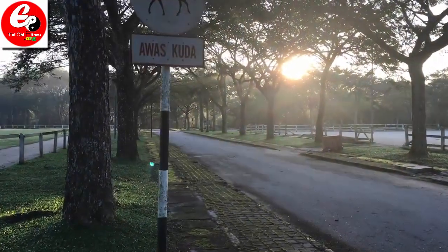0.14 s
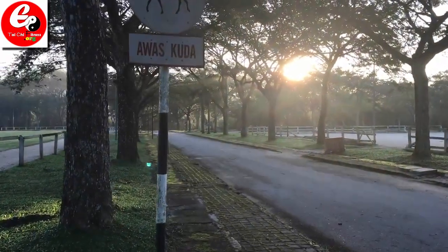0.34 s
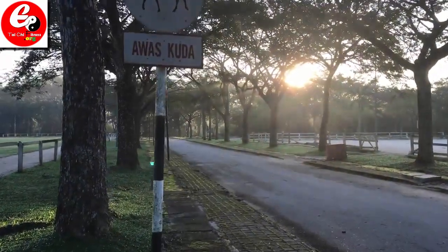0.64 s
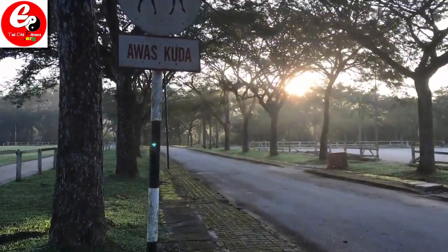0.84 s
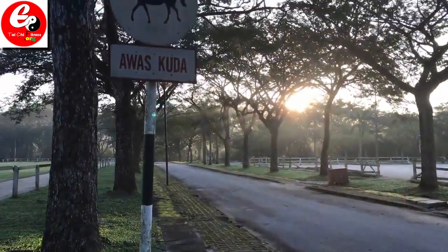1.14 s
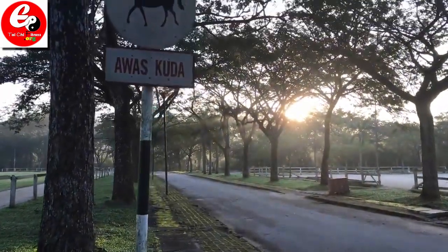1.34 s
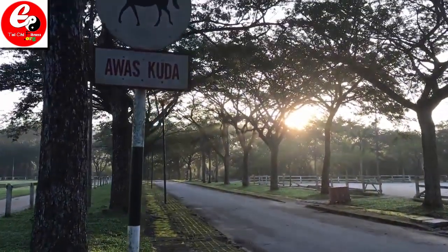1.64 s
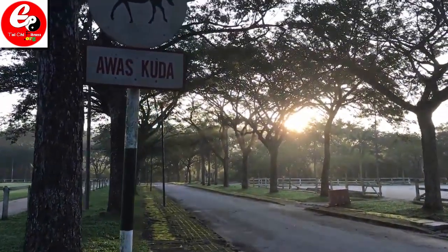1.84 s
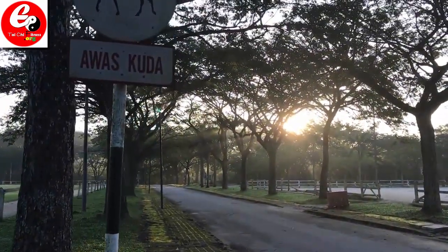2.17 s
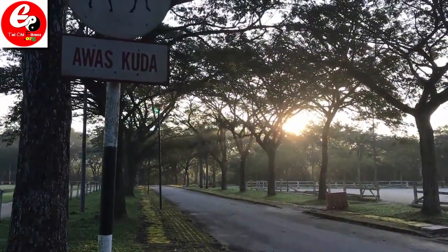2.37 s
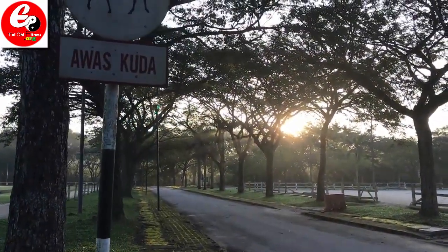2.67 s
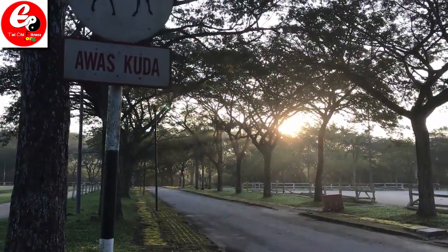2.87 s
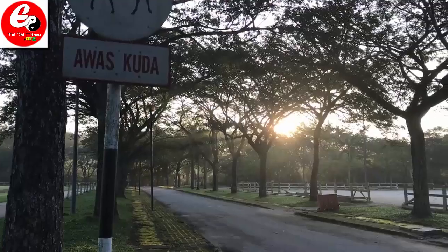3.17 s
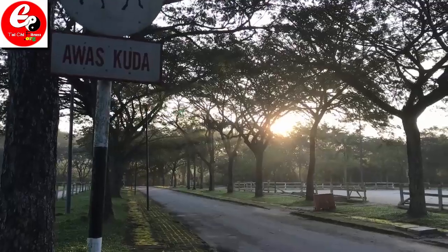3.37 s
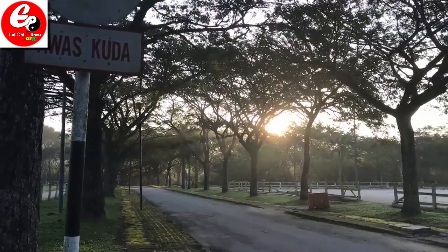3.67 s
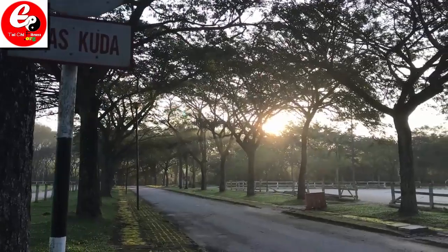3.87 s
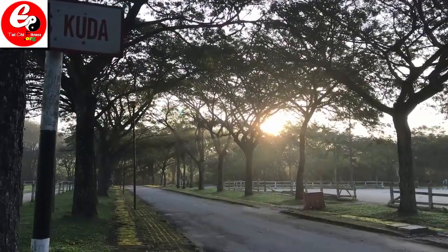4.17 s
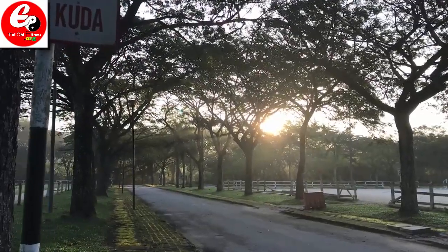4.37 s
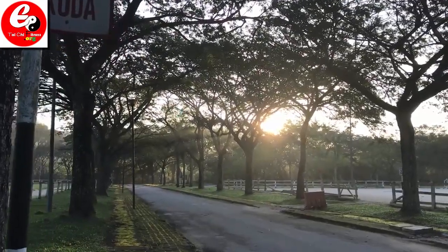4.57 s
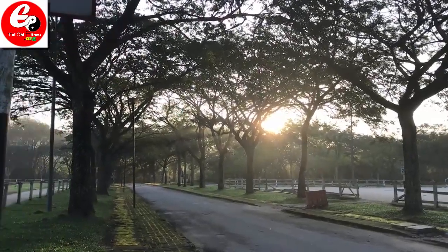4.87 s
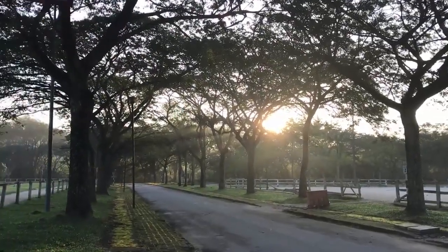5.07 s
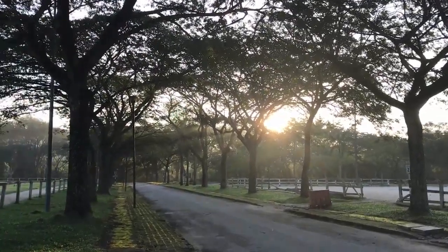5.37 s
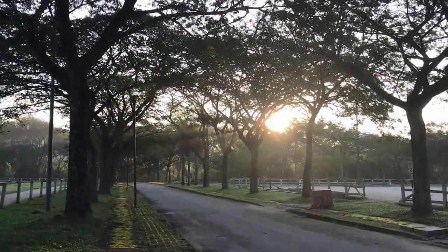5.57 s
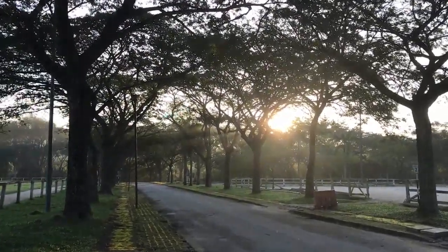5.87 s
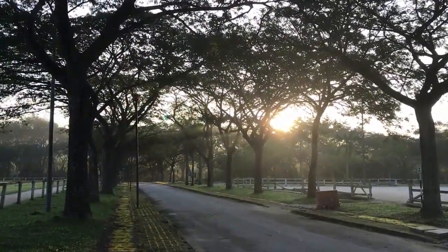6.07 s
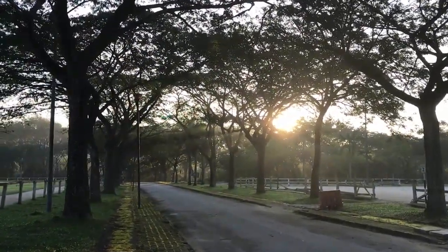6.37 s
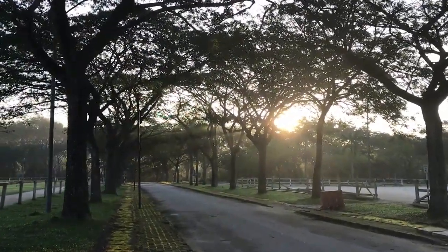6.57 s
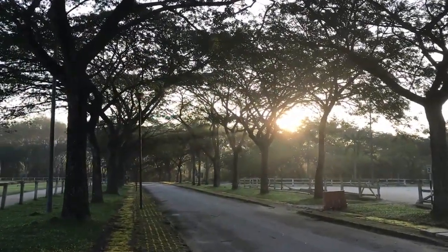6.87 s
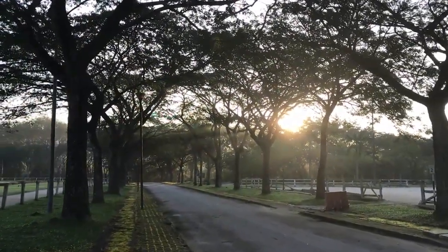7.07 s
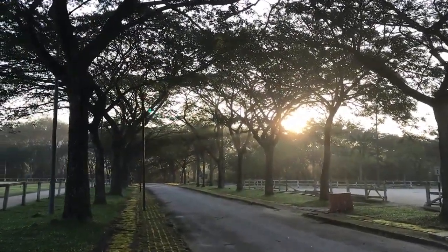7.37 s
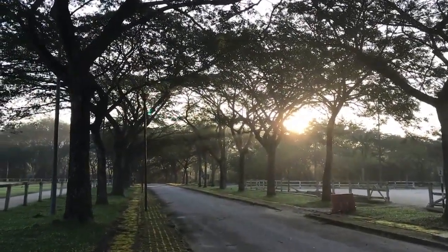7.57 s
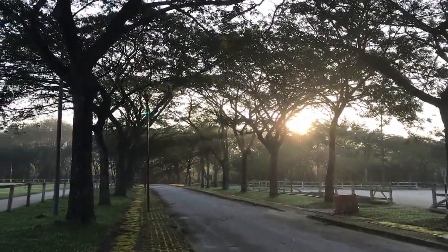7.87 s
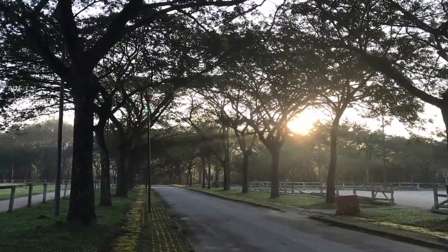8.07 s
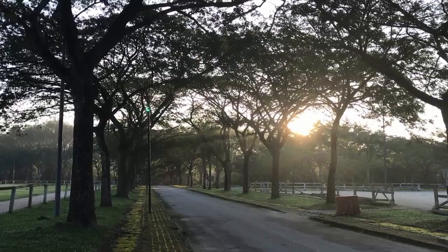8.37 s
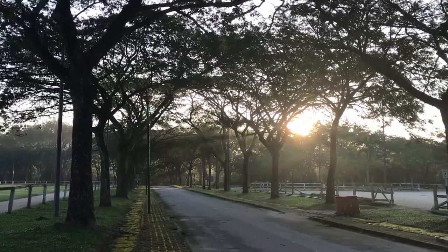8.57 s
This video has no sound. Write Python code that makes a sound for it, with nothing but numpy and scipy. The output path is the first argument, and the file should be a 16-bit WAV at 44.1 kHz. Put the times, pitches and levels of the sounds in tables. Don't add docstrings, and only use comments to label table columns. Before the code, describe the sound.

Dawn birdsong of clear, quick whistles echoes softly through trees, with shrill insect buzz, tiny drips and twig ticks above a distant road rumble.

```python
import sys
import numpy as np
from scipy import signal
from scipy.io import wavfile
from scipy.ndimage import uniform_filter1d

SR = 44100
rng = np.random.default_rng(int(sys.argv[2]) if len(sys.argv) > 2 else 0)


def nominal_scale(level):
    x = np.asarray(level, float) / 20
    return 10 ** x


def persist_wave(psi):
    counts = np.round(np.clip(psi, -1, 1) * 32767).astype(np.int16)
    wavfile.write(sys.argv[1], SR, np.atleast_2d(counts).T)


N = 384993
TIME = np.arange(N) / SR


def evened(x):
    return x / np.sqrt(np.mean(x ** 2) + 1e-20)


def read(points, hz):
    f, value = np.transpose(points)
    return np.interp(np.log(hz + 1), np.log(f + 1), value)


def follow(rows):
    s, *columns = np.transpose(rows)
    return [np.interp(TIME, s, c) for c in columns]


def add(mix, s, sound):
    part = mix[round(s * SR):][:len(sound)]
    part += sound[:len(part)]


def resonate(x, hz, width_hz):
    turn = np.exp(2j * np.pi * np.cumsum(hz * np.ones(len(x))) / SR)
    r = np.exp(-np.pi * width_hz / SR)
    smooth = signal.lfilter([(1 - r) ** 2], np.convolve([1, -r], [1, -r]), x / turn)
    return 2 * (turn * smooth).real


def band(x, lo_hz, hi_hz):
    return signal.sosfilt(signal.butter(3, [lo_hz, hi_hz], "bandpass", fs=SR, output="sos"), x)


def whistle(hz, level_db, edge=0.3):
    noise = rng.standard_normal((2, len(hz) + 1000))
    air = evened(uniform_filter1d(uniform_filter1d(noise, 200), 200))[:, :len(hz)]
    shimmer_db = 1.4 + .14 * max(-56 - level_db, 0)
    shape = signal.windows.tukey(len(hz), np.clip(edge, 0, 1)) * nominal_scale(shimmer_db * air[0])
    phase = 2 * np.pi * np.cumsum(hz + 12 * air[1]) / SR
    return nominal_scale(level_db) * np.sqrt(2) * shape * np.sin(phase)


def arches(rows, lean=1):
    out = np.zeros(N)
    for s, length_s, start, middle, end, db in rows:
        u = np.linspace(0, 1, round(length_s * SR)) ** lean
        bulge_hz = middle - (start + end) / 2
        add(out, s, whistle(start + (end - start) * u + 4 * bulge_hz * u * (1 - u), db))
    return out


def glides(rows, share):
    s, length_s, start, end, db = np.transpose(rows)
    return arches(np.c_[s, length_s, start, start + share * (end - start), end, db])


def songs():
    # (time [s], length [s], pitch [Hz], level [dB])
    held_notes = [(0, 0.064, 3930, -57), (.04, 0.061, 2820, -64), (1.67, 0.03, 3500, -66),
                  (2.06, 0.064, 4200, -65), (2.37, .035, 3480, -68), (2.5, 0.027, 2160, -66),
                  (3.66, 0.067, 3880, -77), (2.26, .04, 3550, -67), (5.15, .055, 2120, -68),
                  (5.15, .15, 2350, -72), (5.72, .05, 4180, -74), (6.62, .11, 5150, -76),
                  (4.265, .03, 5350, -72), (4.19, .06, 4130, -68), (.33, .07, 2680, -66),
                  (6.6, .035, 3750, -64), (1.79, .025, 3500, -63), (3.965, 0.075, 2400, -66),
                  (4.35, 0.065, 2690, -69), (4.405, 0.1, 3600, -56.5), (4.47, .066, 2390, -72),
                  (4.79, .03, 1690, -63), (5.5, 0.045, 2100, -70), (6, 0.13, 2476, -65),
                  (6.383, .015, 2090, -59), (6.399, .015, 2090, -59), (6.416, .015, 2080, -60),
                  (6.47, 0.089, 3800, -69), (6.9, 0.14, 4250, -74), (7.1, 0.017, 3980, -63),
                  (7.2, .09, 3930, -58.5), (7.3, 0.14, 1956, -68), (8.6, 0.083, 2480, -64.5)]
    # (time [s], length [s], middle [Hz], ends [Hz], level [dB])
    arched_notes = [(1.528, .105, 3310, 3040, -57), (1.02, 0.057, 2983, 2680, -67),
                    (1.738, 0.18, 4170, 3560, -54.5), (2.462, .085, 3090, 2680, -68),
                    (4.9, 0.09, 2580, 2300, -64.5), (3.71, .075, 5560, 5250, -73),
                    (1.65, .11, 4360, 4200, -65), (2.73, .05, 3030, 2750, -67),
                    (2.785, .045, 2930, 2700, -68), (2.59, .03, 2880, 2700, -69),
                    (.8, .06, 2950, 2700, -66), (5.625, .095, 2595, 2180, -66),
                    (7.098, 0.14, 3640, 3820, -70), (7.45, .11, 3210, 3045, -59),
                    (7.692, 0.13, 4065, 3560, -55), (8.39, 0.0475, 2780, 2400, -65)]
    # (time [s], length [s], from [Hz], to [Hz], level [dB])
    droops = [(0, 0.08, 3370, 3030, -65), (3.82, 0.19, 2760, 2580, -66), (4.27, 0.034, 4660, 3200, -58),
              (4.53, 0.043, 2700, 2170, -68), (4.56, .16, 3560, 2890, -61), (5.11, 0.04, 2930, 2410, -67),
              (1.5, .03, 3050, 2750, -62), (8.545, .03, 3080, 2750, -63), (5.62, .04, 2750, 2570, -69),
              (5.82, 0.053, 3600, 2840, -64), (6.175, 0.088, 3800, 3664, -55),
              (6.355, 0.08, 3860, 3620, -54.5), (6.425, .028, 3680, 3350, -61),
              (8.33, 0.025, 2770, 2430, -64)]
    falls = [(1.21, 0.034, 3280, 2680, -60.5), (1.37, 0.17, 3260, 3020, -57), (1.9, .03, 4450, 3890, -63),
             (3.22, .02, 5760, 5350, -73), (4.21, 0.048, 2884, 2670, -68), (5.025, 0.03, 3080, 2700, -61),
             (6.1, .27, 3600, 2700, -67), (2.435, .035, 3200, 2750, -67), (2.7, .025, 2600, 2100, -69),
             (5.73, .045, 3150, 2600, -68), (5.81, .045, 2800, 2400, -67), (8.3, .04, 2900, 1950, -68),
             (1.315, .025, 3250, 3000, -64), (6.25, 0.073, 1810, 1683, -62), (6.63, .022, 2100, 1950, -60),
             (6.925, 0.061, 3100, 2410, -63), (8.27, 0.032, 3300, 2940, -57)]
    swoops = [(.175, 0.082, 3180, 2870, -65), (1.55, .07, 2630, 2420, -67), (3.03, 0.085, 3700, 3320, -75),
              (5.585, .18, 3970, 3480, -67), (5.865, .035, 2250, 2090, -61), (5.83, 0.044, 3940, 3670, -65),
              (6.23, .039, 2200, 2030, -63), (7.23, .13, 2480, 2050, -63), (7.54, .04, 2893, 2380, -71),
              (7.82, .15, 2380, 1980, -64), (7.75, .06, 3050, 2950, -66), (8.42, .14, 3270, 3050, -58.5),
              (8.57, .05, 2800, 2480, -67), (5.13, .12, 4250, 4070, -77), (6.16, .025, 4600, 3850, -68)]
    rises = [(5.22, 0.25, 4040, 4420, -74), (4.245, .03, 4250, 4650, -67), (6.02, .022, 4800, 5050, -68),
             (4.935, .055, 5400, 5700, -75), (2.405, .045, 2250, 2650, -70), (1.13, .04, 3300, 3950, -68),
             (1.205, .015, 3600, 4100, -66), (5.6, .04, 2050, 2250, -68), (.418, .026, 2800, 3750, -63),
             (.712, .028, 2750, 3650, -63), (1.18, .02, 3800, 4160, -62), (2.61, 0.055, 5400, 5830, -73),
             (3.185, 0.039, 5230, 5770, -78), (5.92, 0.062, 3243, 3400, -64),
             (7.175, .035, 3720, 3900, -64), (6.652, .016, 2850, 3160, -54),
             (6.678, 0.017, 2910, 3470, -63), (6.8, 0.14, 2730, 2870, -56.5),
             (7.062, .02, 2830, 4180, -58.5), (7.078, .014, 3670, 4070, -62), (8.67, .03, 2650, 2980, -67)]
    s, length_s, hz, db = np.transpose(held_notes)
    ends_hz = hz * (1 - 0.0058)
    out = arches(np.c_[s, length_s, ends_hz, hz, ends_hz, db])
    s, length_s, middle, ends, db = np.transpose(arched_notes)
    out += arches(np.c_[s, length_s, ends, middle, ends, db], lean=0.78)
    out += glides(droops, share=.2) + glides(falls, share=.51)
    return out + glides(swoops, share=.72) + glides(rises, share=.58)


def twitter(count=600):
    # (time [s], level [dB])
    far_birds = [(0, -62.5), (.9, -67), (1.9, -66), (2.2, -66), (2.6, -68), (3.4, -70), (4.3, -65.5),
                 (5.3, -74), (6.5, -64), (7.9, -66.5), (8.73, -72)]
    s, length, hz, bend, arch, size = rng.random((count, 6)).T
    hz = 2500 + 1250 * hz ** 2.4
    bend_hz = np.sign(bend - .9) * (300 + 400 * arch)
    middle_hz = hz + .5 * bend_hz + 150 * size
    rows = np.c_[s * N / SR, .018 + .03 * length, hz, middle_hz, hz + bend_hz, 6.0 * size]
    return evened(arches(rows)) * nominal_scale(follow(far_birds)[0])


def cicada(rows, strokes_per_s):
    # (delay [ms], pitch factor [ratio], width [Hz], level [dB])
    ribs = [
        (0, 1.025, 650, -1),
        (1.2, .995, 500, 0),
        (2.6, .968, 450, -5),
    ]
    level_db, hz = follow(rows)
    strokes = np.flatnonzero(np.diff(np.floor(strokes_per_s * TIME)))
    out = np.zeros(N)
    for delay_ms, pitch, width_hz, db in ribs:
        clicks = np.zeros(N + 1000)
        chance = rng.standard_normal((len(strokes), 2))
        delay = np.round((delay_ms + .25 * chance[:, 0]) * SR / 1000).astype(int)
        clicks[np.maximum(strokes + delay, 0)] = nominal_scale(0.45 * chance[:, 1])
        out += nominal_scale(db) * evened(resonate(clicks[:N], hz * pitch, width_hz))
    return nominal_scale(level_db) * evened(out)


def cicadas():
    # (time [s], level [dB], pitch [Hz])
    cicada_a = [(0, -61, 10150), (.9, -62, 9950), (2.1, -62, 9680), (3.2, -61.5, 9750), (3.75, -61.5, 9580),
                (4.2, -64.5, 9500), (4.75, -60.5, 9530), (5.2, -72, 9600), (6.5, -79, 9600),
                (8.73, -75, 9560)]
    cicada_b = [(0, -66.5, 9260), (2, -69.5, 9230), (4, -69.5, 9500), (4.4, -81.5, 10000), (5.1, -66, 9483),
                (5.8, -67, 9660), (6.3, -71, 9500), (6.6, -73, 9760), (8.73, -76, 9550)]
    cicada_c = [(0, -72, 8950), (1, -68.5, 8930), (3, -66, 8900), (4, -65, 8900), (5.73, -66, 8870),
                (5.76, -84, 8870), (8.73, -84, 8870)]
    # (time [s], throbs so far [count])
    throbs = [(0, 0), (1.25, 7), (1.72, 10), (3.26, 19), (4.79, 28), (5.74, 34), (8.73, 35)]
    stroke_rates = (122.8, 118.4, 112)
    beats = follow(throbs)[0] % 1
    first, second, third = map(cicada, (cicada_a, cicada_b, cicada_c), stroke_rates)
    throb_db = -24 * (1 - beats) ** 3
    return band(first + second + third * nominal_scale(throb_db), 8400, 10600)


def far_insects():
    # (pitch [Hz], width [Hz], level [dB])
    chorus = [
        (9600, 900, -70.5),
        (9050, 800, -75),
    ]
    # (time [s], level [dB], pitch [Hz])
    shrill_points = [(0, -86, 12900), (1.05, -87, 12750), (1.2, -86, 11500), (1.6, -81, 11700),
                     (3.8, -83, 11300), (5.8, -85, 11100), (8.73, -95, 10800)]
    # (time [s], level [dB])
    cricket_points = [(0, -80), (1, -77), (1.26, -87), (2, -76), (2.64, -85), (3.27, -79), (3.9, -82.5),
                      (4.9, -77), (5.31, -88), (6.25, -78), (6.44, -86), (7.8, -81), (8.73, -84)]
    noise = rng.standard_normal((3, N))
    far = sum(nominal_scale(db) * evened(resonate(noise[0], hz, width_hz)) for hz, width_hz, db in chorus)
    shrill_db, shrill_hz = follow(shrill_points)
    shrill = nominal_scale(shrill_db) * evened(resonate(noise[1], shrill_hz, 750))
    crickets_db = follow(cricket_points)[0]
    crickets_hz = 6830 + 25 * (crickets_db + 85.5)
    return far + shrill + nominal_scale(crickets_db) * evened(resonate(noise[2], crickets_hz, 420))


def rustle():
    # (time [s], length [s], level [dB])
    gusts = [
        (1.33, 0.35, -79),
        (4.1, .45, -73),
        (4.937, 0.264, -75),
        (5.776, 0.53, -84),
        (6.55, 0.27, -79),
    ]
    still_db, rise_s, fade_db = -84.5, 0.023, -14.5
    grains = rng.standard_normal(N) * (0.72 + (rng.random(N) < 900 / SR) * 3.0)
    level = np.full(N, nominal_scale(still_db))
    for s, length_s, db in gusts:
        t = np.arange(0, length_s, 1 / SR)
        ramps = np.clip(np.minimum(t, length_s - t) / rise_s, 0, 1)
        add(level, s, nominal_scale(db + fade_db * t / length_s) * ramps)
    body = evened(resonate(grains, 5400, 3500))
    top = evened(resonate(grains, 13000, 3000))
    return nominal_scale(4.5) * level * (body + nominal_scale(-13) * top)


def wash(spectrum, patchy_db):
    hz = np.fft.rfftfreq(2048, 1 / SR)
    a, b, patches = rng.standard_normal((N // 512 + 5, 1025, 3)).T
    patches = evened(uniform_filter1d(uniform_filter1d(patches, 20, 0), 8, 1))
    z = (a + 1j * b) * nominal_scale(read(spectrum, hz)[:, None] + patchy_db * patches)
    return evened(signal.istft(z, nperseg=2048, noverlap=1536)[1][:N])


def traffic_and_air():
    # (frequency [Hz], density [dB per Hz])
    traffic = [(12, -40), (24, -34), (58, 0), (122, 0.5), (171, -4), (340, -17), (484, -27), (1040, -21.5),
               (1320, -23.5), (1840, -32.5), (2200, -36.5), (2860, -72), (4840, -120)]
    air = [(1500, -8.5), (2200, -4.5), (3500, -1), (5000, -9.5), (7500, -14), (11000, -9), (13000, -19.5),
           (16000, -19)]
    return nominal_scale(-43) * wash(traffic, patchy_db=0.56) + nominal_scale(-70) * wash(air, patchy_db=2.2)


def ticks():
    # (time [s], ring pitch [Hz], ring level [dB], top level [dB])
    drips = [(.0132, 6200, -47, -60), (.014, 2200, -50, -75), (.4763, 7000, -70, -64),
             (.899, 4500, -62, -80), (.9822, 7500, -62, -70), (2.0884, 7000, -72, -71),
             (2.173, 6000, -58, -61), (2.6698, 4800, -66, -82), (2.852, 5000, -62, -82),
             (4.1344, 6000, -65, -73), (4.156, 5800, -62, -82), (4.173, 5800, -63, -82),
             (4.241, 5800, -64, -82), (4.3493, 7000, -76, -63), (4.356, 7000, -76, -66),
             (4.4064, 7000, -76, -67), (4.413, 7000, -76, -68), (4.4752, 5200, -53, -64),
             (5.03, 6000, -64, -85), (5.13, 4600, -61, -78), (5.537, 4200, -53, -73),
             (5.989, 7500, -63, -56), (6.1296, 7500, -74, -68), (6.1634, 7500, -67, -63),
             (6.4777, 6200, -50, -71), (6.575, 5500, -64, -85), (6.6854, 4200, -58, -67),
             (6.8922, 5000, -57, -70), (6.991, 4600, -54, -72), (7.237, 6000, -63, -69),
             (7.238, 2400, -53, -86), (8.1444, 7500, -67, -72), (8.6934, 6500, -57, -63)]
    twigs = [(3.487, 3600, -58, -80), (4.21, 1700, -46, -80), (4.216, 1800, -49, -86),
             (4.725, 4500, -61, -67), (4.871, 2500, -51, -85), (4.8994, 3000, -49, -85),
             (4.9756, 2900, -48, -67), (4.986, 3000, -51, -71), (5.078, 3900, -60, -79),
             (5.243, 2600, -56, -86), (5.4321, 3300, -52, -70), (5.777, 2600, -56, -76),
             (5.919, 3200, -56, -82), (5.944, 2000, -54, -86), (5.985, 1900, -55, -86),
             (6.3844, 2300, -50, -82), (6.405, 2300, -53, -86), (6.5204, 3200, -53, -71),
             (6.7825, 2200, -43, -75), (7.346, 2600, -56, -84), (7.8825, 3200, -54, -79)]
    ring_span, ring_cycles, top_t60_s = 1.45, 70, .008
    ring_db, splash_db, top_gain_db = 19, -14, 22
    out = np.zeros(N)
    t = np.arange(600) / SR
    for s, hz, db, top_db in drips + twigs:
        a, b, c = rng.standard_normal((3, 600))
        fade = nominal_scale(-60 * t * hz / ring_cycles)
        parts = (band(a * fade, hz / ring_span, hz * ring_span),
                 band(b * fade, 1500, 8500),
                 band(c * nominal_scale(-60 * t / top_t60_s), 10500, 14800))
        ring, splash, top = (p / np.linalg.norm(p) for p in parts)
        burst = nominal_scale(db + ring_db) * (ring + nominal_scale(splash_db) * splash)
        add(out, s, burst + nominal_scale(top_db + top_gain_db) * top)
    return out


def slides(rows, middle):
    out = np.zeros(N)
    for s, length_s, start, end, db in rows:
        u = np.linspace(0, 1, round(length_s * SR))
        v = (u - middle) / (.86 - 0.605 * middle) + .5
        ease = np.sin(np.pi / 2 * np.clip(v, 0, 1) ** np.clip(.6 + middle, .5, 1.1)) ** 2
        droop = 0.72 * np.maximum(-v, 0)
        add(out, s, whistle(start + (end - start) * (ease + droop), db, edge=0.27))
    return out


def sliding_calls():
    # (time [s], length [s], from [Hz], to [Hz], level [dB])
    leaps = [
        (.297, 0.066, 4400, 3800, -53.5),
        (.44, 0.06, 4090, 2720, -64),
        (.596, 0.053, 4600, 3824, -53.5),
        (.737, 0.055, 3700, 2600, -64),
    ]
    early_slides = [(2.17, .17, 3330, 2835, -64.5), (8.09, .125, 3340, 2844, -63),
                    (3.19, 0.225, 2900, 3330, -68), (3.49, .17, 3266, 3880, -67.5),
                    (3.595, 0.135, 2560, 2970, -62), (5.045, .225, 2740, 2980, -60.5),
                    (6.575, .135, 2380, 2847, -58)]
    tumbles = [
        (2.02, .065, 4320, 3220, -56.5),
        (7.935, .075, 4130, 3160, -58),
    ]
    return slides(leaps, .08) + slides(early_slides, .26) + slides(tumbles, .47)


def hisses():
    # (time [s], length [s], from [Hz], to [Hz], level [dB])
    chirps = [
        (1.3, .24, 5350, 5800, -73),
        (5.79, .06, 5200, 5400, -76),
        (.85, .2, 3900, 4000, -72),
        (4.3, .2, 4300, 4000, -72),
        (1.4, .2, 3700, 3500, -70),
    ]
    out = np.zeros(N)
    for s, length_s, start, end, db in chirps:
        hz = np.linspace(start, end, round(length_s * SR))
        breath = evened(resonate(rng.standard_normal(len(hz)), hz, width_hz=700))
        add(out, s, nominal_scale(db) * np.hanning(len(hz)) ** .5 * breath)
    return out


def climbs():
    # (time [s], length [s], from [Hz], to [Hz], level [dB])
    two_steps = [
        (.96, .17, 3430, 4140, -58),
        (7.41, .175, 3490, 4280, -55),
        (7.705, .165, 3420, 4470, -54.5),
        (8.02, 0.17, 3440, 4235, -53),
    ]
    upper_s, hollow_hz, jump_share = .1, 448, 0.287
    break_db, break_s = -4, .012
    out = np.zeros(N)
    for s, length_s, low, high, db in two_steps:
        lower_s = length_s - upper_s
        t = np.arange(0, length_s, 1 / SR) - lower_s
        first = low + hollow_hz * (t / lower_s + 0.335) ** 2
        ease = np.sin(np.pi / 2 * np.clip(t / (.8 * upper_s), 0, 1))
        second = low + (high - low) * (jump_share + (1 - jump_share) * ease)
        hz = uniform_filter1d(np.where(t < 0, first, second), size=400, mode="nearest")
        effort_db = break_db * np.exp(-(t / break_s) ** 2) + 28 * t
        add(out, s, whistle(hz, db) * nominal_scale(effort_db))
    return out


def trill(count=14):
    # (first [s], period [s], first top [Hz], last top [Hz], fall [Hz], level [dB])
    phrase = (2.533, .0766, 3080, 2800, 430, -64.5)
    first_s, period_s, top, last, fall, db = phrase
    late, high, loud = rng.standard_normal((count, 3)).T
    hz = np.linspace(top, last, count) + 45 * high
    s = first_s + period_s * np.arange(count) + .003 * late
    return arches(np.c_[s, np.full(count, .025), hz, hz - .3 * fall, hz - fall, db + 1.2 * loud])


def far_sweeps():
    # (time [s], length [s], from [Hz], to [Hz], level [dB])
    sweeps = [
        (3.7, 0.09, 4850, 3880, -72),
        (3.77, .07, 4500, 3950, -75),
        (3.97, .07, 4450, 3900, -74),
        (3.92, 0.089, 4770, 3800, -71),
        (6.038, 0.042, 5050, 3200, -64),
        (7.258, 0.085, 8500, 3800, -70),
    ]
    return glides(sweeps, share=.45)


def knees():
    # (time [s], length [s], from [Hz], to [Hz], level [dB])
    bent_notes = [
        (4.06, .115, 2950, 4260, -55.5),
        (5.775, .19, 3200, 4260, -65),
        (8.29, .1, 3100, 4150, -72),
    ]
    knee_s, knee_share = .009, .66
    out = np.zeros(N)
    for s, length_s, start, end, db in bent_notes:
        t = np.arange(0, length_s, 1 / SR)
        shoot = knee_share * (1 - np.exp(-t / knee_s))
        creep = (1 - knee_share) * np.sin(np.pi / 2 * t / length_s)
        add(out, s, whistle(start + (end - start) * (shoot + creep), db, edge=.22))
    return out


def trees(x):
    # (frequency [Hz], t60 [s])
    decay = [(1500, 0.79), (4000, 0.64), (8000, 0.43), (14000, 0.52)]
    taps = np.zeros(SR)
    at = np.arange(400, SR - 20, 20)
    taps[at + rng.integers(0, 20, len(at))] = rng.choice([-1., 1.], len(at))
    hz, t, z = signal.stft(taps, SR, nperseg=256)
    tail = signal.istft(z * nominal_scale(-60 * t / read(decay, hz)[:, None]), SR, nperseg=256)[1]
    return signal.fftconvolve(x, tail / np.linalg.norm(tail))[:N]


def scene():
    birds = songs() + sliding_calls() + hisses() + climbs() + trill() + knees()
    far, faint = far_sweeps(), twitter()
    small, buzz = ticks(), cicadas()
    near_sends = nominal_scale(-9.5) * birds + nominal_scale(-5.5) * small + nominal_scale(-8.0) * buzz
    echo = trees(near_sends + nominal_scale(5) * far + nominal_scale(-6.0) * faint)
    steady = birds + nominal_scale(-2.5) * far + nominal_scale(-3.5) * faint + echo + buzz
    steady += far_insects() + rustle() + traffic_and_air()
    lowpass = signal.firwin(401, 15250, window=("kaiser", 8), fs=SR)
    dulled = signal.oaconvolve(steady, lowpass, "same")
    return (dulled + small)[None]


def band_limit(x):
    return signal.sosfilt(signal.butter(12, 15920, fs=SR, output="sos"), x)


def record(dry):
    thinned = signal.sosfilt(signal.butter(2, 38, "highpass", fs=SR, output="sos"), dry)
    return band_limit(thinned)


dry = scene()
out = record(dry)
persist_wave(out)
```